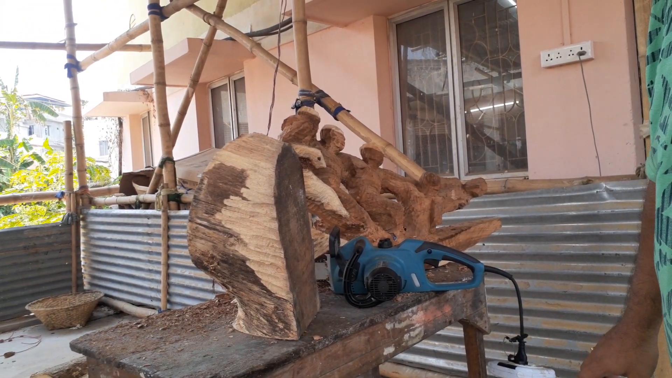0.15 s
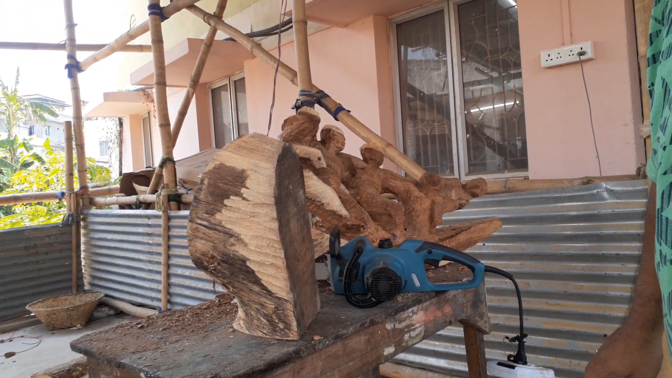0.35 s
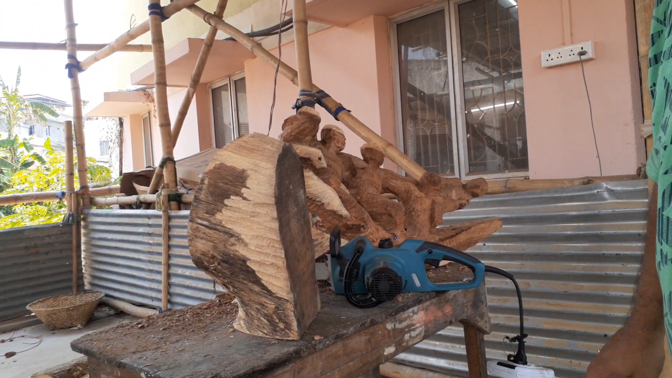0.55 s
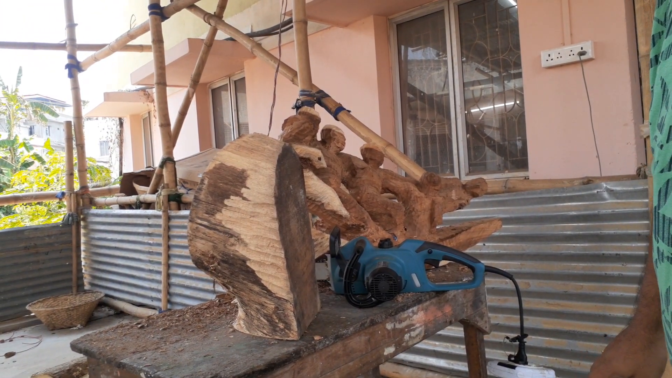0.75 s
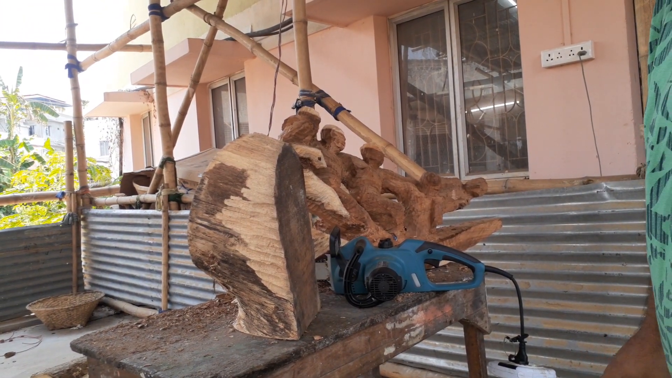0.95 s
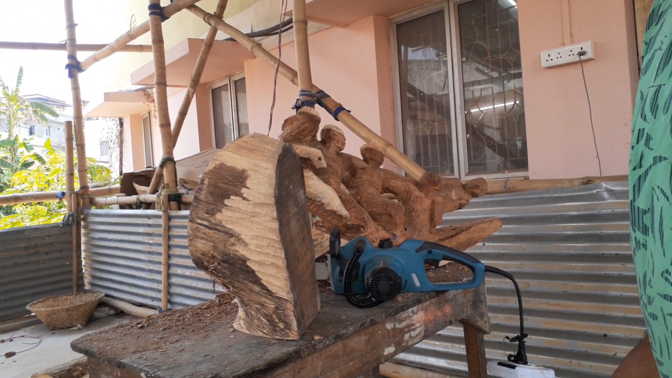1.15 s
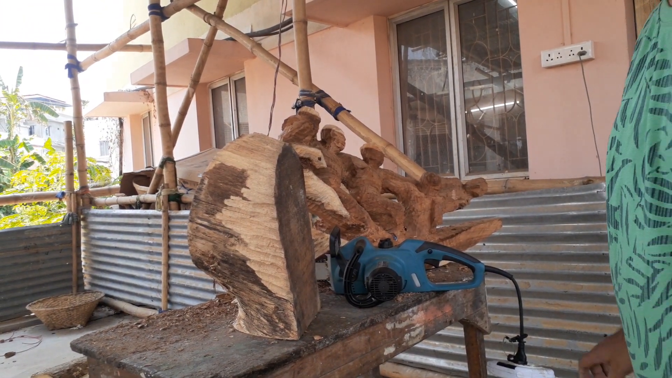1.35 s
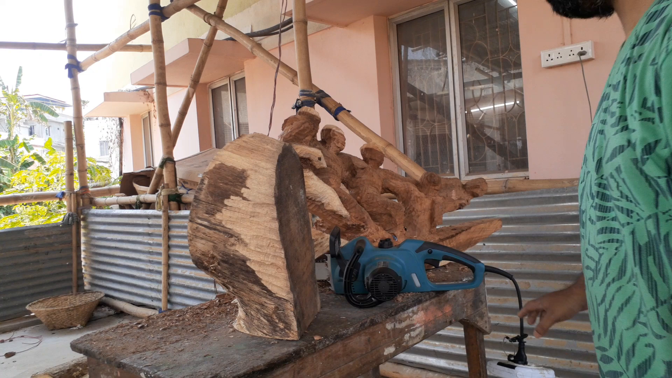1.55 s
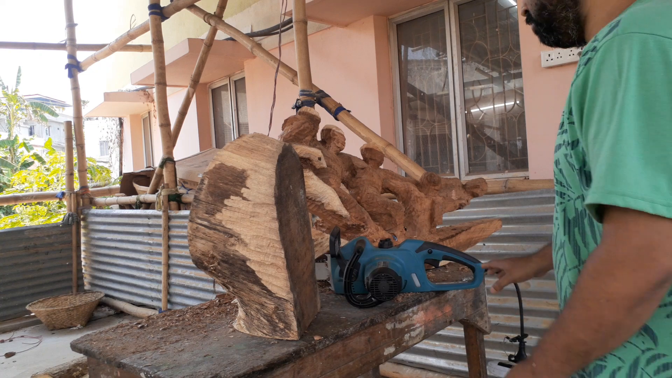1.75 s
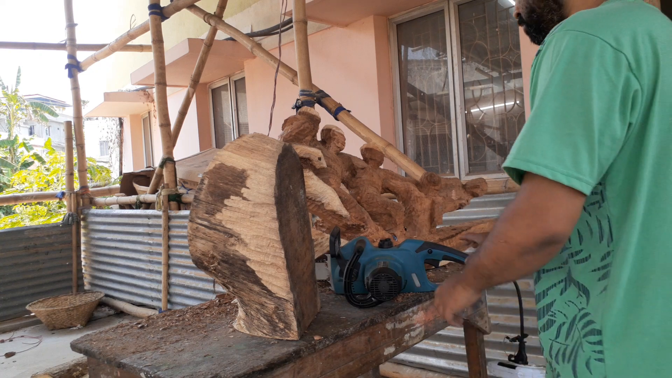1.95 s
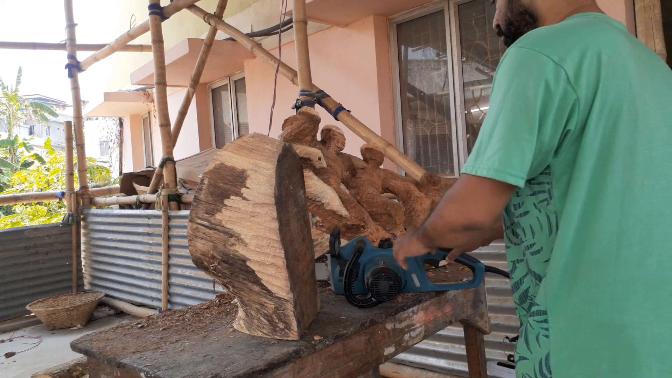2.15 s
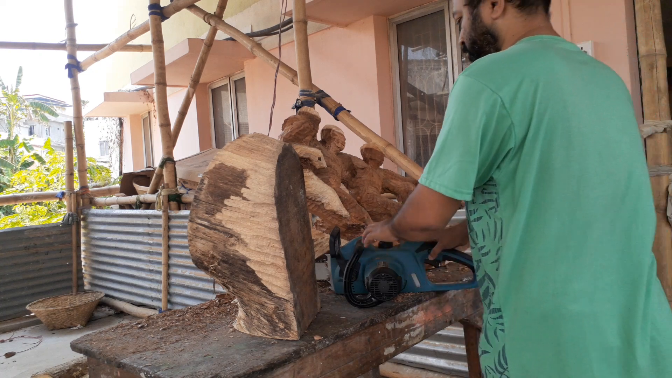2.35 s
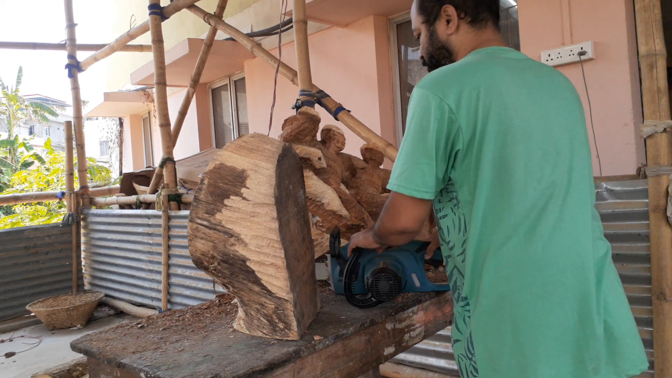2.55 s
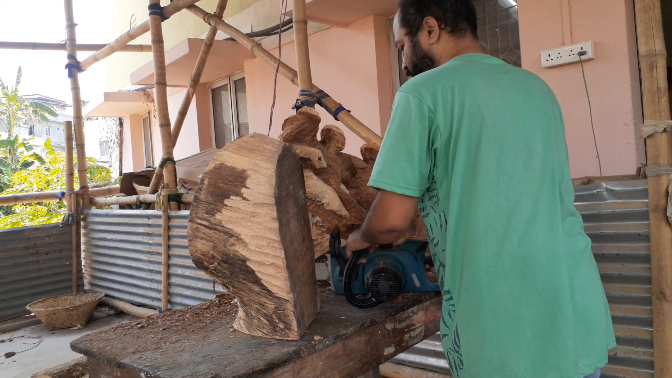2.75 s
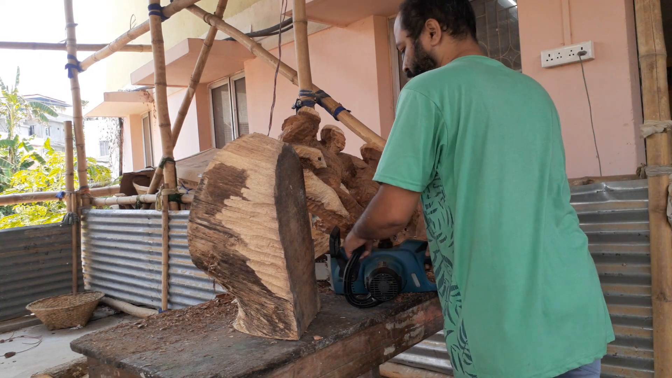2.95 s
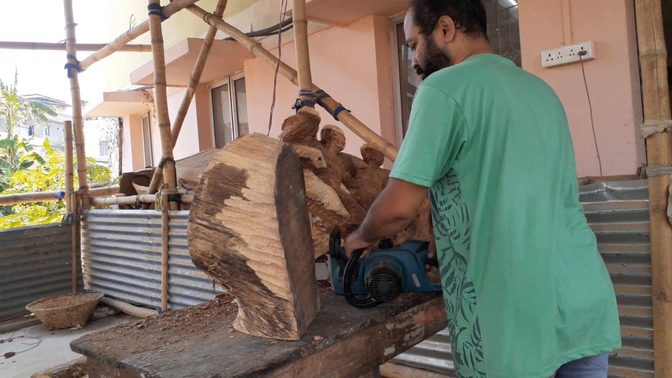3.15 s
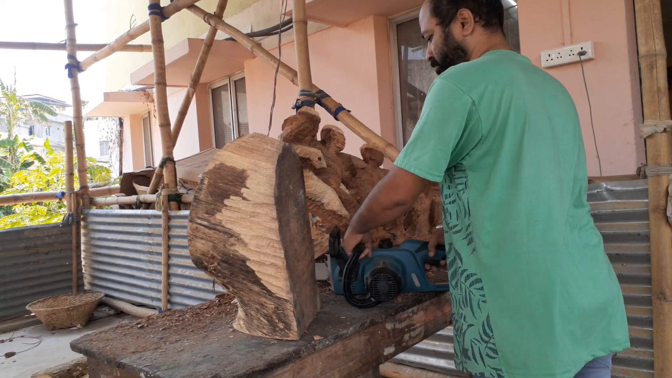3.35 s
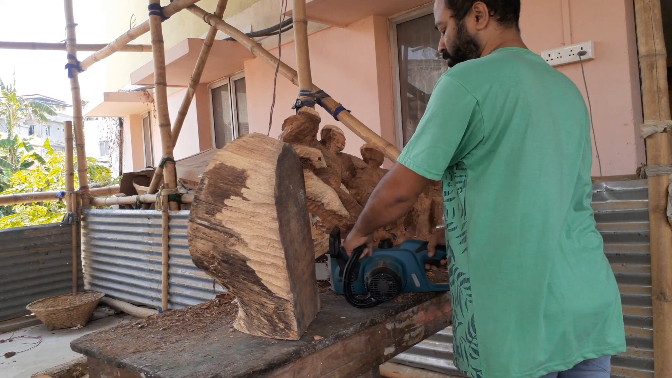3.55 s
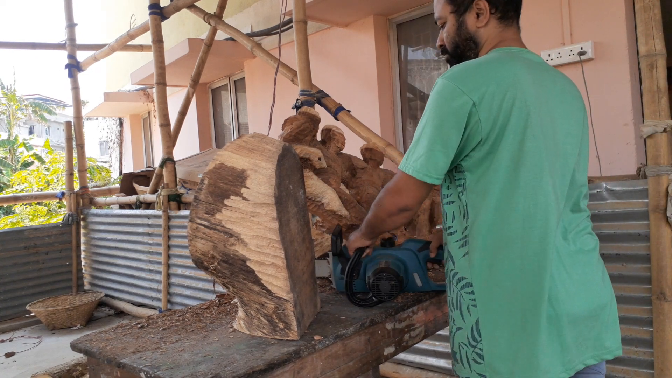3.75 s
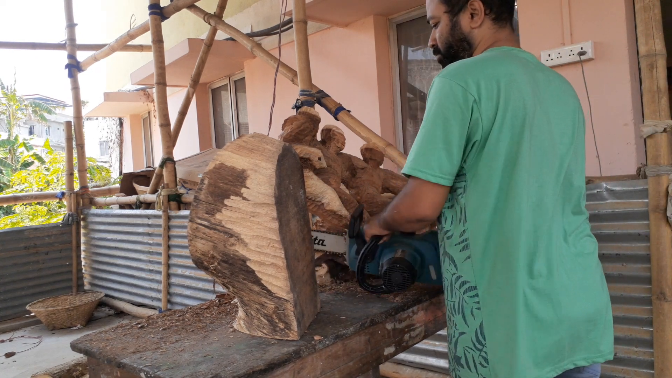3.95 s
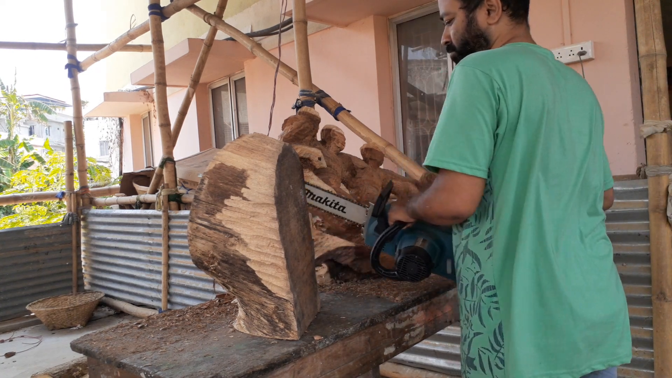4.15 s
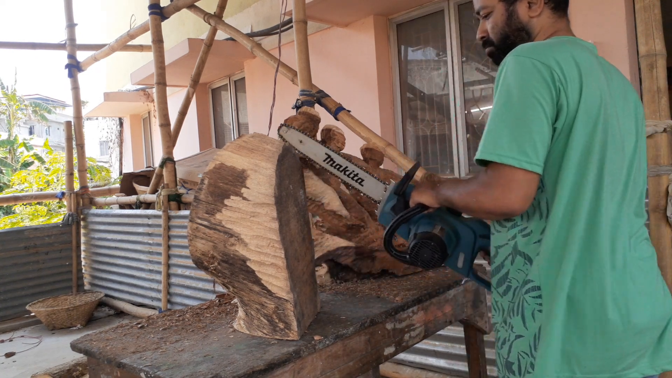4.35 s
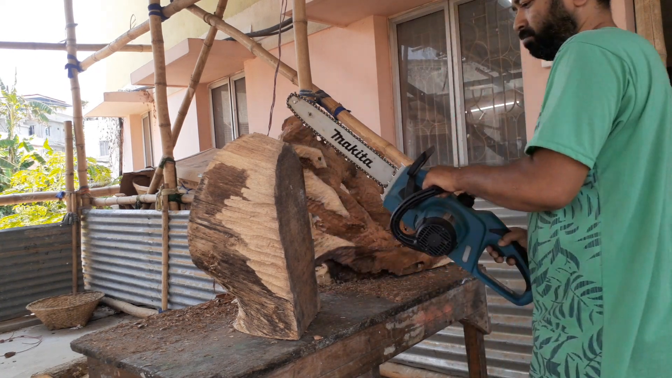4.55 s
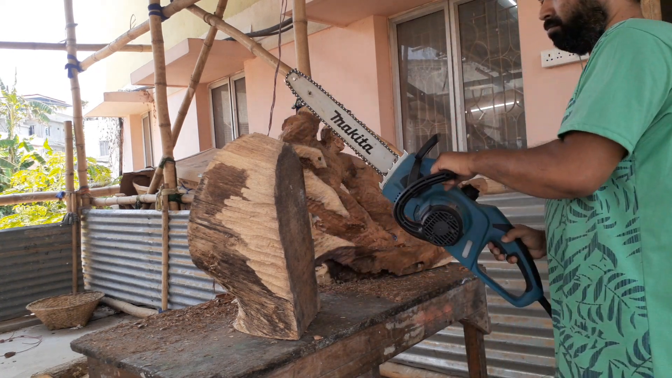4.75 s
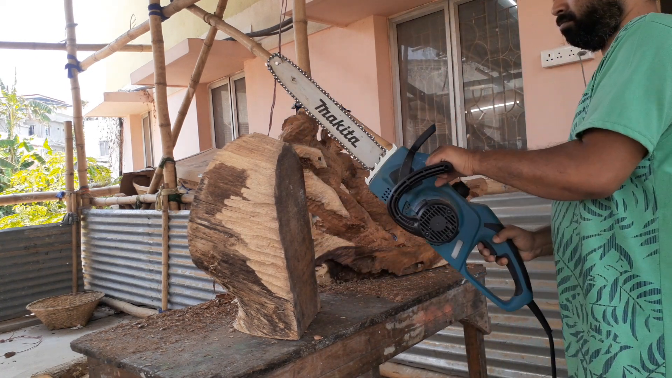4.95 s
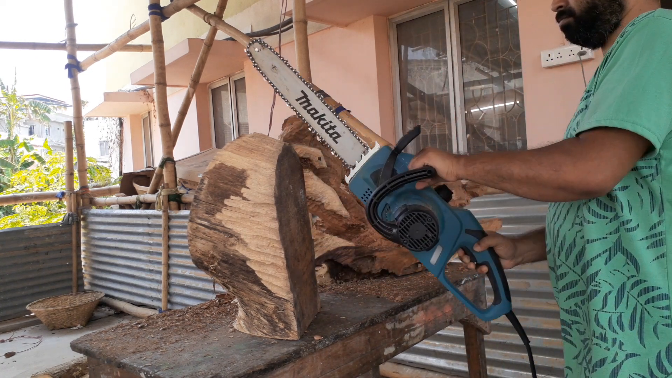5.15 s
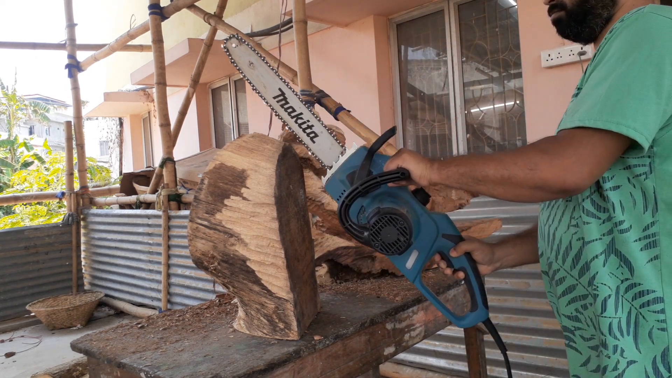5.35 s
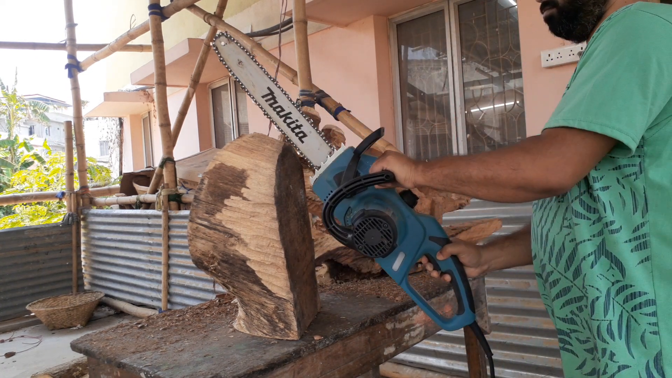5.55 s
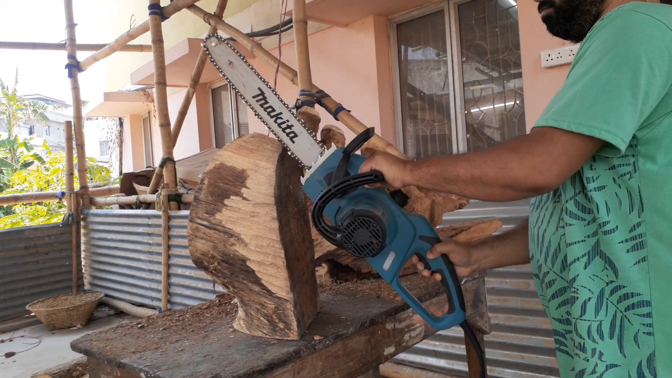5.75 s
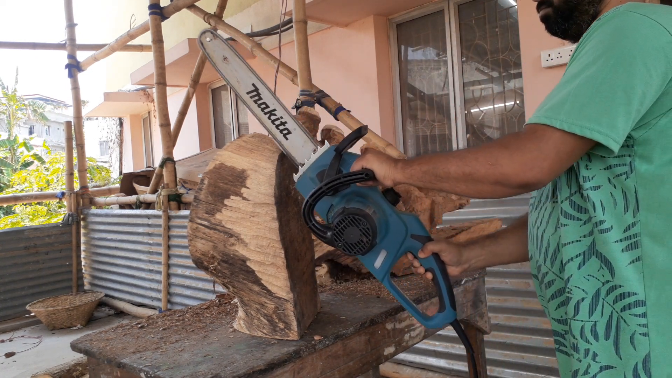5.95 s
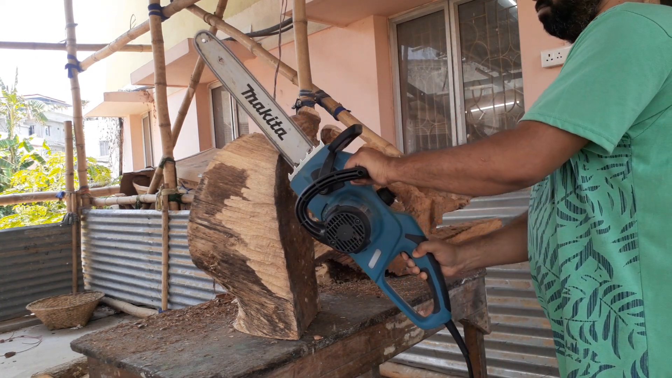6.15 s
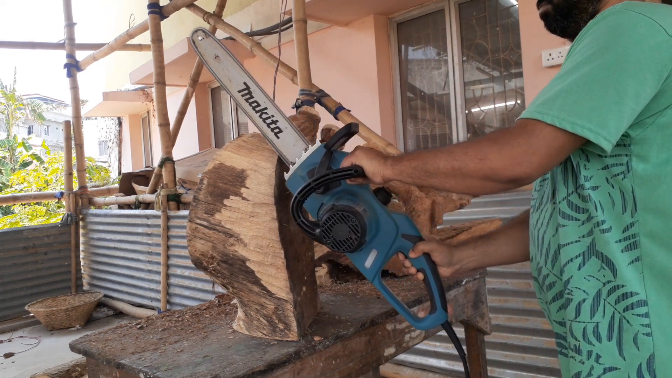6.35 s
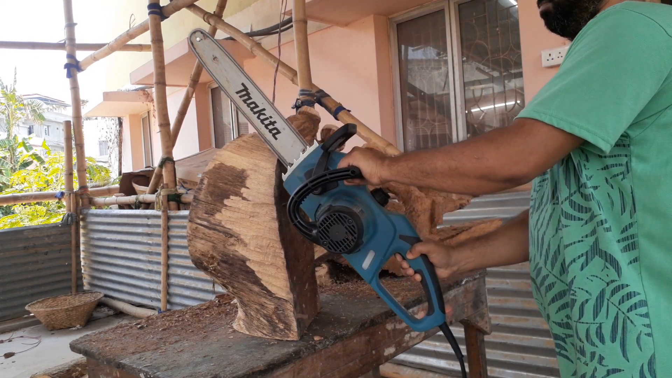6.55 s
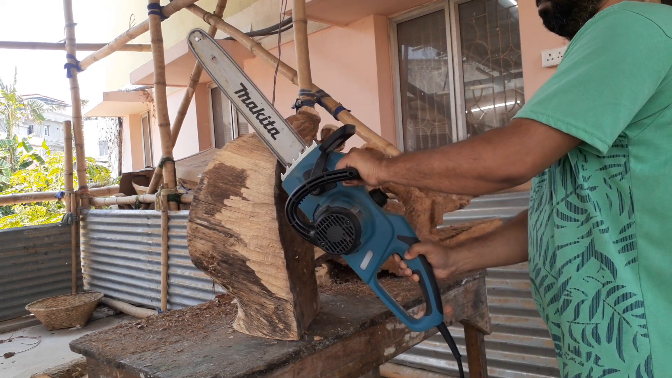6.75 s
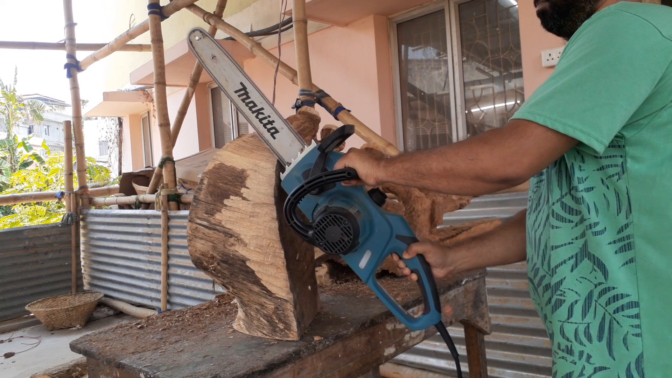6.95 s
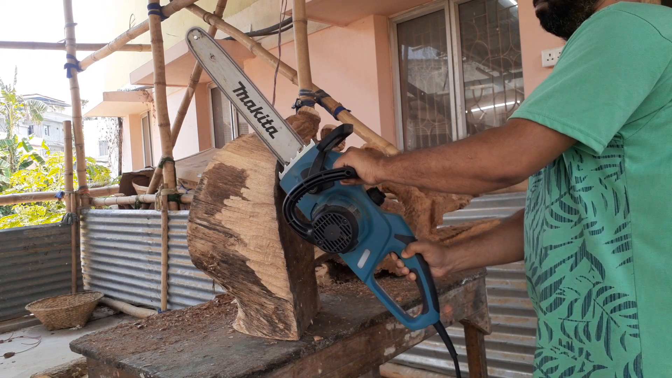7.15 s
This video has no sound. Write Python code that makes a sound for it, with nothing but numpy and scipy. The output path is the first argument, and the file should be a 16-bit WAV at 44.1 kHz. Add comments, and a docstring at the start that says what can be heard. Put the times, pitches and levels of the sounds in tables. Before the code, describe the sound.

An electric chainsaw starts up close by after several seconds of quieter woodcarving sounds outdoors. First come light mallet knocks on a chisel, echoing briefly off nearby walls, with one short gritty scrape, soft cloth rustle and a few plastic clicks as the saw is lifted. A far machine hums and a bird chirps faintly. Then the saw clacks into motion, much louder, its whine rising to a steady, rattling, hissing free run.

```python
"""An electric chainsaw jolts on close by and spins up freely, ending a scene in a woodcarver's yard.
Its motor drives growling gears, a rattling chain and a hissing fan, with a whine that climbs in pitch.
Before that, a mallet taps a ringing chisel on the right and something gritty scrapes on the left.
Clothes rustle and the plastic handle clicks as the saw is picked up.
Behind it all, a distant machine hums over the outdoor rumble and a far bird chirps."""
import sys
import numpy as np
from scipy import signal
from scipy.fft import rfft, irfft, next_fast_len
from scipy.io import wavfile
from scipy.ndimage import map_coordinates

SR = 44100
rng = np.random.default_rng(int(sys.argv[2]) if len(sys.argv) > 2 else 0)


def wrap_up_sound(samples):
    """Save the sound to the file named by the first command line argument, as 16-bit audio."""
    columns = np.atleast_2d(samples).T
    # keep every value between -1 and 1, then stretch to whole-number steps
    tamed = np.clip(columns, -1, 1)
    steps = np.round(tamed * 32767).astype(np.int16)
    wavfile.write(sys.argv[1], SR, steps)


N = 317961
SWITCH_ON_S, SNAP_S = 5.9365, 5.969  # the saw starts; its slack chain jerks tight

# how alike the yard sounds in both ears: pitch_hz, likeness (1 = the same)
YARD_LIKENESS = [(100, 1), (350, 0.48), (800, 0.69), (3000, 0.06), (8000, 0.033)]
# tone of the chain's metal links: pitch_hz, level_db
CHAIN_TONE = [(100, -70), (900, -43), (1450, -7.5), (1800, -3), (2700, -1.5), (3600, -3), (4500, -3.5),
              (5700, -5), (7000, -12), (10000, -17.5)]


def amp(db):
    """Turns decibels into a gain."""
    return 10 ** (np.asarray(db) / 20)


def unit(x):
    """Scales a sound to an average (rms) level of 1."""
    return x / np.sqrt(np.mean(x ** 2) + 1e-20)


def along(points, hz):
    """Reads between (pitch_hz, value) points on a log pitch scale."""
    pitches, values = np.transpose(points)
    return np.interp(np.log(hz + 1), np.log(pitches + 1), values)


def clock():
    """The time of every sample, in seconds."""
    return np.arange(N) / SR


def running_time():
    """Seconds since the saw was switched on."""
    return np.maximum(clock() - SWITCH_ON_S, 0)


def rise(rise_s):
    """Fades from 0 towards 1 once the saw is on."""
    return 1 - np.exp(-running_time() / rise_s)


def wobble(rate):
    """A smooth curve through `rate` random values a second."""
    return map_coordinates(rng.standard_normal(int(N * rate / SR) + 4), [np.arange(N) * rate / SR])


def noise(size=N):
    """Two channels of white noise."""
    return rng.standard_normal((2, size))


def filtered(x, response):
    """Filters a sound; response(hz) gives the gain and phase at each pitch."""
    length = x.shape[-1]
    padded = next_fast_len(length + SR // 4)
    return irfft(rfft(x, padded) * response(np.fft.rfftfreq(padded, 1 / SR)), padded)[..., :length]


def coloured(x, tone):
    """Shapes a sound by (pitch_hz, level_db) points, then scales it to level 1."""
    return unit(filtered(x, lambda hz: amp(along(tone, hz))))


def resonances(modes, hz):
    """Response of an object that rings at each (pitch_hz, width_hz, level_db)."""
    return sum((-1) ** k * amp(db) * 1j * hz * width / (pitch ** 2 - hz ** 2 + 1j * hz * width)
               for k, (pitch, width, db) in enumerate(modes))


def sides(pan_db):
    """Left and right gains; a positive pan_db is louder on the left."""
    return amp(np.array([pan_db, -pan_db]).reshape(2, -1) / 2)


def spread(pair, likeness, lag_ms):
    """Blends two unrelated signals into stereo; a positive lag_ms delays the left side."""
    angle = lambda hz: np.arccos(np.clip(along(likeness, hz), -1, 1)) / 2
    mid, side = filtered(pair, lambda hz: np.array([np.cos(angle(hz)), np.sin(angle(hz))]))
    delay_s = np.array([[lag_ms], [-lag_ms]]) / 2000
    return filtered(np.array([mid + side, mid - side]), lambda hz: np.exp(-2j * np.pi * hz * delay_s))


def add(track, s, sound):
    """Mixes a sound in, starting at s seconds."""
    span = track[:, round(s * SR):][:, :sound.shape[-1]]
    span += sound[..., :span.shape[-1]]


def envelope(peak_s, attack_s, hold_s, fall_db_per_s):
    """Rises to 1 at peak_s, holds, then dies away."""
    age = clock() - peak_s
    return np.clip(1 + age / attack_s, 0, 1) * amp(-fall_db_per_s * np.maximum(age - hold_s, 0))


def together(gains):
    """The joint gain of unrelated sounds, which add in power."""
    return np.sqrt(sum(gain ** 2 for gain in gains))


def yard_echo():
    """The yard's blurred echo; the treble dies first."""
    # how long it takes to fall 60 dB: pitch_hz, fade_s
    fade_times = [(200, 0.55), (900, 0.65), (3000, 0.68), (6000, 0.55), (14000, 0.27)]
    hz, t, spectrum = signal.stft(noise(size=SR * 3 // 4), SR, nperseg=256)
    fade = amp(-60 * t / along(fade_times, hz)[:, None])
    tail = signal.istft(spectrum * fade, SR, nperseg=256)[1]
    return tail / np.linalg.norm(tail[0])


def distant_machine(shaft_hz=23.28, recede_db=-12):
    """A turning shaft throbs along with mains hum; both recede once the saw runs."""
    # the machine's tones: cycles_per_turn
    multiples = [12, 13, 14, 15, 16, 19, 20]
    # the strength of each: level_db
    levels = [-64, -51, -47.7, -43.5, -81, -70, -56.5]
    # mains hum and other drones: pitch_hz, level_db
    drones = [(61.6, -64), (99.9, -78), (123.3, -54.5), (199.8, -50.5), (332.8, -56)]
    t = clock()
    turns = shaft_hz * t + .012 * wobble(1.5)
    tones = [(k * turns, db) for k, db in zip(multiples, levels)] + [(hz * t, db) for hz, db in drones]
    hum = sum(amp(db + .8 * wobble(2)) * np.sqrt(2) * np.sin(2 * np.pi * cycles) for cycles, db in tones)
    return hum * amp(np.interp(running_time(), [0, .1], [0, recede_db])) * sides(pan_db=-1.0)


def outdoor_air(level_db=-39, bass_hz=170, sink_db=-18, sink_s=0.54):
    """A soft rush whose low rumble swells now and then and sinks once the saw runs."""
    # tone of the open air: pitch_hz, level_db
    air_tone = [(20, -36), (36, -29), (58, 0), (100, -1), (160, -5.5), (250, -8), (350, -1), (500, -8),
                (700, -8.5), (1200, -14), (2500, -17.5), (5000, -27.5), (9000, -38.5), (12000, -38),
                (15800, -49)]
    # swells of the rumble: peak_s, hold_s, gain_db
    swells = [(0.02, .08, 1.5), (0.683, 0.033, -1), (1.4, .04, 0), (3.078, .1, 2), (3.95, 0.31, 1.5),
              (5.767, 0.077, 4.5)]
    likeness = [(100, 0.98), (350, 0.41), (900, 0.05), (3000, 0.038)]
    air = amp(level_db + 0.066 * wobble(4.94)) * spread(coloured(noise(), air_tone), likeness, lag_ms=0)
    rumble = filtered(air, lambda hz: 1 / (1 + (hz / bass_hz) ** 4))
    surges = [amp(db) * envelope(s, 0.17, hold_s, fall_db_per_s=59) for s, hold_s, db in swells]
    calm = amp(1.4 * wobble(5))
    sink = amp(sink_db * np.minimum(running_time() / sink_s, 1))
    return air - rumble + rumble * together(surges + [calm]) * sink


def clothes(grain_db=1.0, attack_s=0.042, fall_db_per_s=86):
    """Cloth brushes in fine uneven grains with every movement."""
    # one brush per movement: peak_s, hold_s, level_db
    brushes = [(0.005, .01, -43.5), (.095, 0.014, -41.5), (.355, .01, -56), (2.293, 0.27, -44.5),
               (2.603, 0.047, -39), (2.846, 0.12, -35), (4.54, 0.0092, -48.5), (5.044, .05, -49.5)]
    # sleeves stirring while the saw is carried: peak_s, hold_s, level_db
    sleeves = (2.8, 2.5, -58.5)
    # tone of rubbing cloth: pitch_hz, level_db
    cloth_tone = [(500, 11), (1500, 12), (3800, 7.5), (6200, 2.5), (8500, -1), (11500, -1), (15500, -9)]
    motion = together(amp(db) * envelope(s, attack_s, hold_s, fall_db_per_s)
                      for s, hold_s, db in brushes + [sleeves])
    rustle = coloured(noise() * amp(grain_db * wobble(900)), cloth_tone)
    return spread(motion * rustle, [(500, 0.2), (5000, 0.057)], lag_ms=0.335)


def bird(length_s=.045):
    """A far bird's short falling chirps, blurred by the yard."""
    # its calls: start_s, start_hz, end_hz, level_db
    chirps = [(.14, 4600, 3800, -46), (4.89, 5400, 4300, -50), (4.96, 4100, 3500, -50)]
    out, progress = np.zeros((2, N)), np.linspace(0, 1, round(length_s * SR))
    for s, start_hz, end_hz, db in chirps:
        pitch_hz = start_hz + (end_hz - start_hz) * progress
        chirp = np.sin(np.pi * progress) * np.sin(2 * np.pi * np.cumsum(pitch_hz) / SR)
        add(out, s, amp(db) * signal.fftconvolve(chirp[None], yard_echo(), axes=1))
    return out


def mallet(gain_db=33, direct_db=-3, wall_db=-3, scatter_db=2.24, firmness=0.38, echo_jitter=0.056):
    """Each blow rings the chisel and wood block; walls and roof return most of the sound."""
    # mallet blows: start_s, level_db, extra_knock_db, extra_ring_db, extra_edge_db
    blows = [(0.929, -22.5, -1, -2.5, -4), (1.175, -21, -0.5, 0, 1), (1.674, -25.5, 3.5, 0, 5),
             (2.311, -24, -6, -2.5, -2.5), (2.554, -21.5, 3, 2.5, 7), (2.793, -23, 1, -2.5, 1),
             (3.028, -19.5, 0.5, 0, 4), (3.29, -21.5, 0.5, 4, 1), (3.894, -21.5, -1.5, 1, -1),
             (4.132, -19.5, -1.5, -2.5, 0.5), (4.381, -19.3, 1.5, -0.5, 2.5), (5.325, -25.5, 1.5, -1.5, 0),
             (5.566, -22, 1, 0, 2), (5.828, -22.5, 3.5, 4, 1.5)]
    # ringing of chisel and block: pitch_hz, width_hz, level_db
    chisel_modes = [(617, 67, -2), (828, 59, 6), (1130, 290, -7), (1420, 91, 3.5), (1774, 220, -4),
                    (2110, 194, 0), (2600, 216, -2.5), (2844, 204, -1.5), (3126, 120, -12.5),
                    (4600, 130, -7)]
    # tone of the blow's crack: pitch_hz, level_db
    crack_tone = [(200, -21), (500, -7), (2500, -17.5), (4000, -12.5), (5500, -22), (7500, -52.5),
                  (15000, -38)]
    # first echoes off the walls: delay_s, level_db
    walls = [(.0045, -8.5), (.0115, -9.5), (.0145, -5), (.024, -8.5), (.048, -7.5)]
    out = np.zeros((2, N))
    usual_db = np.mean(blows, axis=0)[1]
    for s, db, knock_db, ring_db, edge_db in blows:
        blow = yard_echo()
        t = np.arange(blow.shape[1]) / SR
        crack = rng.standard_normal(len(t)) * amp(-60 * t / .005)
        crack *= amp(firmness * (db - usual_db)) / np.linalg.norm(crack)  # firm blows crack harder
        blow[0] += amp(direct_db) * crack
        for delay_s, echo_db in walls:
            echo = amp(wall_db + echo_db) * np.array([[1], [.4]]) * crack
            add(blow, delay_s * np.exp(echo_jitter * rng.standard_normal()), echo)
        force = [(800, knock_db), (1700, 0), (2750, ring_db), (4500, edge_db)]
        modes = [(hz, width, level + scatter_db * rng.standard_normal())
                 for hz, width, level in chisel_modes]
        chisel = lambda hz: resonances(modes, hz) + amp(along(crack_tone, hz))
        ring = filtered(blow, lambda hz: chisel(hz) * amp(along(force, hz)))
        add(out, s, amp(db + gain_db) * ring / np.linalg.norm(ring))
    return spread(out, YARD_LIKENESS, lag_ms=0.33)


def scrape(grain_db=3, attack_s=0.033):
    """Short gritty slides on the left, coarse grains over a hollow rush."""
    # slides, each weaker than the last: peak_s, body_db, grit_db
    slides = [(1.331, -20, -23.5), (1.435, -27.5, -44), (1.552, -46, -47)]
    # the hollow rush: pitch_hz, level_db
    body_tone = [(120, -39), (200, -9), (277, -16), (337, -9), (433, 1.5), (542, -10), (610, -1.5),
                 (1070, 1), (1860, -3), (3860, -9), (7000, -25), (9100, -36), (15400, -120)]
    # the bright grit: pitch_hz, level_db
    grit_tone = [(2350, -36), (4000, -4.5), (6050, -9), (7530, -12), (12000, -15.5), (15800, -24)]
    body = together(amp(db) * envelope(s, attack_s, 0.021, fall_db_per_s=106) for s, db, _ in slides)
    grit = together(amp(db) * envelope(s, attack_s, 0, fall_db_per_s=172) for s, _, db in slides)
    grains = amp(grain_db * wobble(900))
    slide = body * coloured(noise() * grains, body_tone) + grit * coloured(noise() * grains, grit_tone)
    return spread(slide, [(300, 1.0), (1500, 0.25), (8000, 0.18)], lag_ms=-0.333) * sides(pan_db=1.5)


def handle(fade_s=.024, echo_db=-24, echo_s=.4):
    """The plastic handle clicks as the saw is gripped and swung up."""
    # handle clicks: start_s, level_db, pitch_hz, width_hz, snap_db
    clicks = [(2.276, -29, 1900, 1100, -20), (2.311, -17, 1700, 600, -32), (3.604, -26, 3300, 1100, -11),
              (5.046, -28.5, 2600, 1100, -14)]
    out, t = np.zeros((2, N)), np.arange(SR // 4) / SR
    for s, db, pitch_hz, width_hz, snap_db in clicks:
        modes = [(pitch_hz, width_hz, 0)]
        shell = lambda hz: resonances(modes, hz) ** 2 + amp(snap_db) / (1 + 1j * hz / 5000)
        click = unit(filtered(noise(size=len(t)), shell))
        fade = amp(-60 * t / fade_s) + amp(echo_db - 60 * t / echo_s)
        add(out, s, amp(db) * click * fade)
    return spread(out, YARD_LIKENESS, lag_ms=0.022)


def strikes(cycles, scatter_db):
    """A gain that pulses with one fading hit per cycle; steady until the saw starts."""
    running = clock() > SWITCH_ON_S
    strength = amp(scatter_db * rng.standard_normal(N))
    beat = np.exp(-1.2 * (cycles % 1)) * strength[cycles.astype(int)]
    return np.where(running, beat / np.sqrt(np.mean(beat[running] ** 2)), 1)


def gear_growl(turns, torque, level_db=-31, torque_db=18, tug_db=4, tug_s=0.043):
    """The gears growl once a turn, louder as the motor pulls and the tightening chain tugs."""
    # tone of the gears: pitch_hz, level_db
    gear_tone = [(35, -65), (60, -24), (219, -43), (240, -24), (257, -9.5), (327, -17.5), (406, -10),
                 (584, -6), (829, -2), (1090, -1.5), (1500, -0.5), (1950, -36), (3300, -120)]
    t = clock()
    tug = (t > SNAP_S) * np.exp(-np.abs(t - SNAP_S) / tug_s)
    gain = amp(level_db + torque_db * torque + tug_db * tug) * rise(0.048)
    return gain * coloured(noise() * strikes(turns, scatter_db=1.5), gear_tone)


def chain_rattle(links, torque, level_db=-22.3, torque_db=9.5, slap_db=0.68):
    """Links hit the drive wheel and guide bar; the slack chain slaps unevenly."""
    gain = amp(level_db + torque_db * torque + slap_db * wobble(60)) * rise(.06)
    return gain * coloured(noise() * links, CHAIN_TONE)


def fan_hiss(links, torque, level_db=-19.5, torque_db=4.5):
    """Air hisses from the fan, pulsing gently in time with the links."""
    # tone of the rushing air: pitch_hz, level_db
    fan_tone = [(200, -80), (4000, -34), (7000, -12), (8500, -3), (11000, -1), (13000, 2), (15500, -1.5)]
    gain = amp(level_db + torque_db * torque + 0.67 * wobble(50)) * rise(.06)
    return gain * coloured(noise() * np.sqrt(links), fan_tone)


def housing_jolt(turns, level_db=-19, fade_s=0.12, gear_teeth=12):
    """At the start the gear teeth take up their slack and shake the saw's casing."""
    # ringing of the casing: pitch_hz, width_hz, level_db
    housing_modes = [(343, 58, 2.5), (600, 260, -9), (850, 99, -1.5), (1140, 130, 1), (1360, 260, -1.5),
                     (3330, 290, -8.5), (5700, 450, -5.5)]
    teeth = noise() * strikes(gear_teeth * turns, scatter_db=1.5)
    ring = unit(filtered(teeth, lambda hz: resonances(housing_modes, hz)))
    return amp(level_db) * np.exp(-(running_time() / fade_s) ** 2) * ring


def chain_jerk(clack_db=-23, clack_s=0.017, snap_db=-21, ring_s=.08):
    """The chain clacks as it first moves, then snaps tight and rings the guide bar."""
    # ringing of the bar: pitch_hz, width_hz, level_db
    bar_modes = [(5700, 630, 0)]
    t = clock()
    clack = amp(clack_db) * np.exp(-running_time() / clack_s) * coloured(noise(), CHAIN_TONE)
    fade = (t > SNAP_S) * amp(-60 * np.abs(t - SNAP_S) / ring_s)
    ring = unit(filtered(noise(), lambda hz: resonances(bar_modes, hz) ** 2))
    return clack + amp(snap_db) * fade * ring


def whine(turns, speed, rough_db=1.3, flutter_radians=.42):
    """Tones locked to the shaft; they flutter as the saw moves among its own echoes."""
    # tones of imbalance, drive wheel, rotor, gear teeth and fan blades: cycles_per_turn
    multiples = [1, 1.6744, 2, 2.2326, 2.5116, 3.3488, 4, 8, 12, 34]
    # the strength of each: speeding_up_db, full_speed_db, pan_db
    levels = [(-47, -55, 0), (-42.5, -44, 1), (-43, -46, 1), (-43, -42, 3), (-47, -42.5, 1), (-44, -46, 1),
              (-32.5, -37.5, 1), (-39, -40, 11), (-45, -44, -5), (-38, -35, 8)]
    # shares of full speed between which the levels settle: from_share, to_share
    settling = (.965, .99)
    out = np.zeros((2, N))
    for k, (rising_db, full_db, pan_db) in zip(multiples, levels):
        db = np.interp(speed, settling, [rising_db, full_db]) + 1.6 * wobble(14)
        db += rough_db * wobble(120)  # uneven bearings and brushes
        flutter = flutter_radians * np.array([wobble(45), wobble(45)])
        out += amp(db) * sides(pan_db) * np.sqrt(2) * np.sin(2 * np.pi * k * turns + flutter)
    return speed * out


def chainsaw(full_speed_hz=465.4):
    """The motor spins up gears, chain and fan; all are louder while its pull (torque) is high."""
    # a quick surge and a slow creep up to speed: speed_share, time_constant_s
    run_up = [(.512, .0557), (.488, .2323)]
    # how alike the saw sounds in both ears: pitch_hz, likeness
    likeness = [(100, 0.86), (300, 1), (1400, 0.79), (3100, 0.87), (6000, .2), (14000, 0.29)]
    # how much louder it is on the left: pitch_hz, pan_db
    panning = [(60, 9), (110, 5), (200, 3), (380, 0), (700, 2.5), (1290, 0.5), (2380, 2), (4400, -2),
               (8120, 8.5), (15000, 6.5)]
    # the level dips briefly: middle_s, half_width_s, depth_db
    level_dip = (6.315, 0.013, -3)
    age = running_time()
    torque = sum(share * np.exp(-age / s) for share, s in run_up)  # 1 at rest, 0 at full speed
    speed = 1 - torque
    turns = np.cumsum(full_speed_hz * speed * (1 + .0004 * wobble(25))) / SR
    # the pull throbs at twice the mains frequency, most while the motor draws starting current
    throb = 1 + (.04 + .2 * np.exp(-age / .12)) * np.sin(2 * np.pi * 100 * age)
    growl = gear_growl(turns, torque)
    links = strikes(6 * 12 / 43 * turns, scatter_db=0)  # six-tooth drive wheel, geared down 12:43
    rattle = chain_rattle(links, torque)
    hiss = fan_hiss(links, torque)
    body = throb * (growl + rattle + housing_jolt(turns)) + chain_jerk() + hiss
    body = spread(body, likeness, lag_ms=-0.05)
    body = filtered(body, lambda hz: sides(along(panning, hz)))
    dip_s, half_width_s, dip_db = level_dip
    dip = amp(dip_db * np.exp(-((clock() - dip_s) / half_width_s) ** 2))
    return rise(.0005) * dip * (body + whine(turns, speed))


def scene():
    """Everything heard in the yard."""
    background = distant_machine() + outdoor_air() + bird()
    return background + mallet() + scrape() + clothes() + handle() + chainsaw()


def record(dry):
    """Rounds off the highest peaks and cuts the very top of the treble."""
    ceiling, top_hz = .65, 15950
    rounded = dry / (1 + np.abs(dry / ceiling) ** 4) ** (1 / 4)
    return filtered(rounded, lambda hz: np.interp(hz, [top_hz - 150, top_hz + 100], [1, 0]))


dry = scene()
out = record(dry)
wrap_up_sound(out)
```